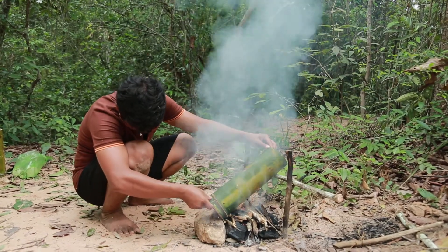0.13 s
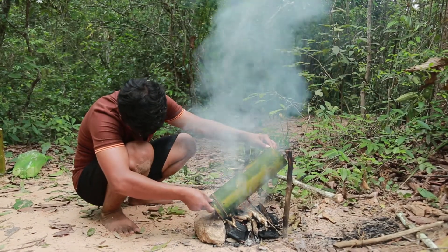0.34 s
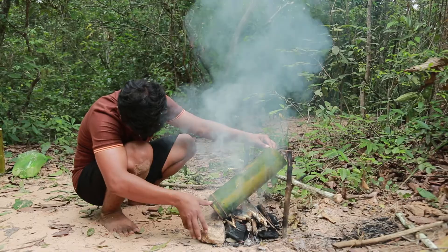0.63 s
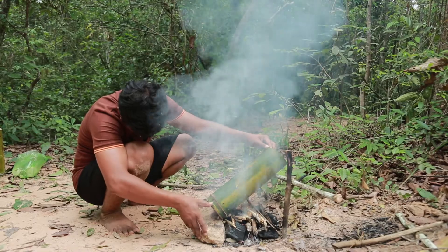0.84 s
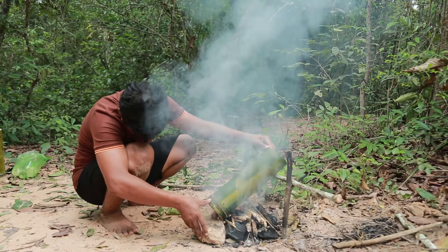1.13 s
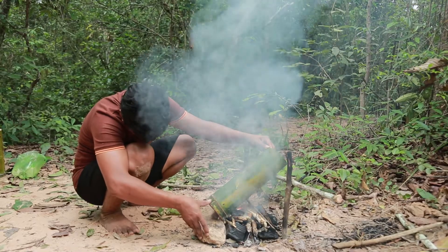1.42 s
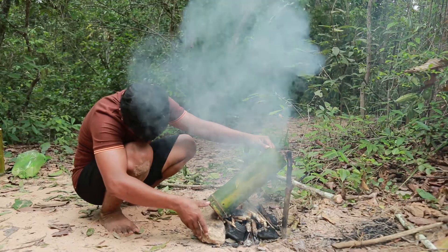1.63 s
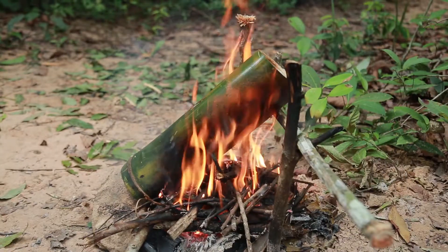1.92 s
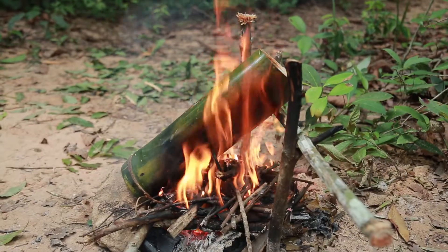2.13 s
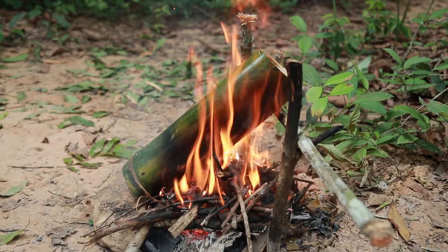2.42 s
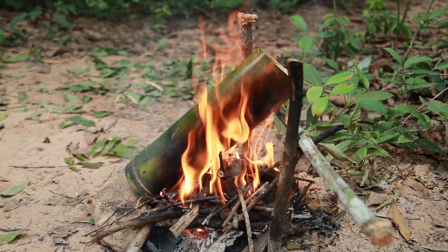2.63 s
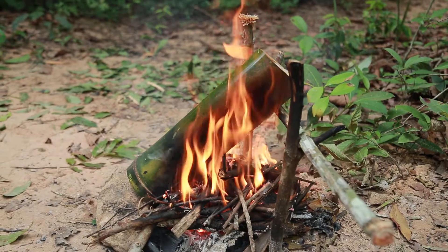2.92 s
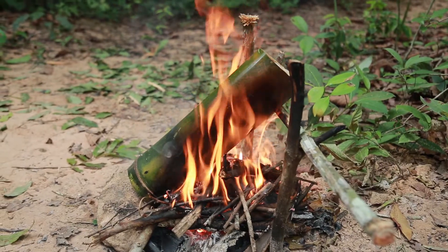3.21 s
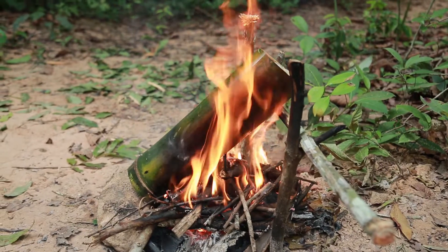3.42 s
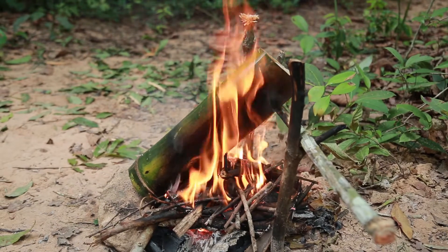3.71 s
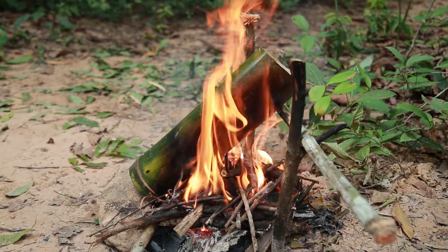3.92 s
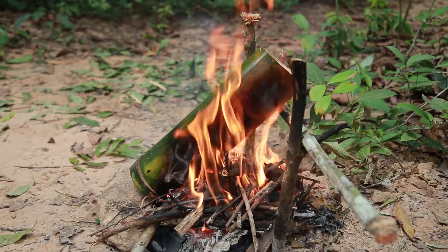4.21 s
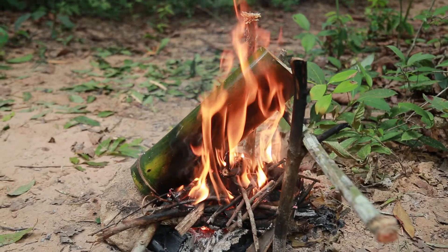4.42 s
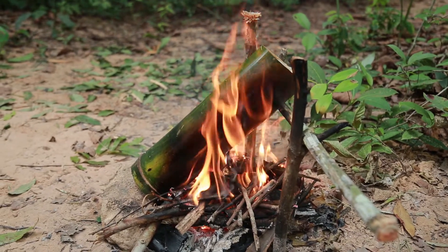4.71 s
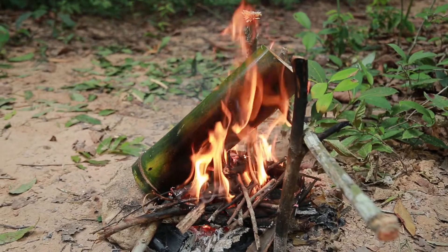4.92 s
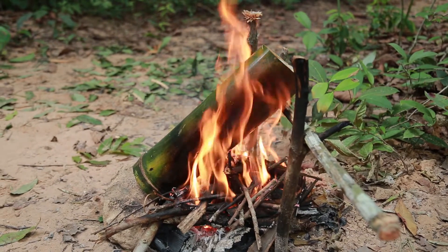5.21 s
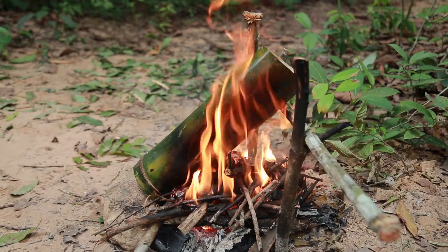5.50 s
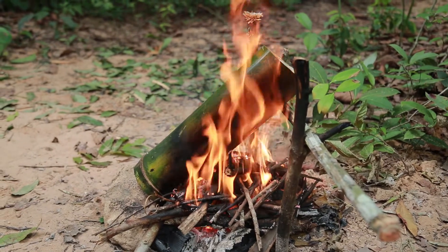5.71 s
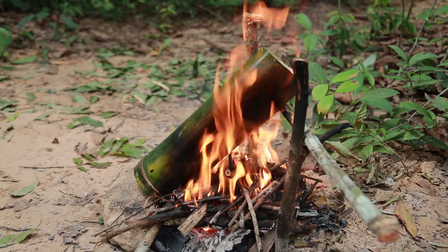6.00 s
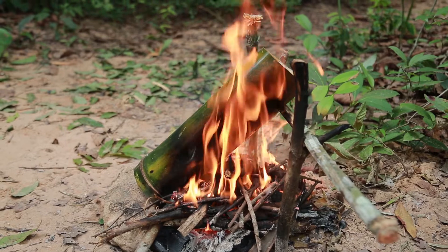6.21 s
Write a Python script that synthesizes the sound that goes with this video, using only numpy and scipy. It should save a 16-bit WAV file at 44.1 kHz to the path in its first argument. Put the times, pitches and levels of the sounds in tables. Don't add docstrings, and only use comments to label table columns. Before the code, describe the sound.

First, quiet outdoor ambience with crickets trilling at a high wavering pitch, faint breeze rumble and small dry clicks. Then a hard cut through a blink of silence to a close-miked fire: bright, spitting sap hiss, flapping low flames, little boiling blips and crisp gas pops with a quick ground slap. Several cracks jump out, and one near the end is far louder than the rest. No reverberant tail.

```python
import sys
import numpy as np
from scipy import signal
from scipy.fft import rfft, irfft
from scipy.io import wavfile
from scipy.ndimage import uniform_filter1d

SR = 44100
rng = np.random.default_rng(int(sys.argv[2]) if len(sys.argv) > 2 else 0)


def digitize_waveform(pressure):
    field = np.atleast_2d(pressure).T
    bounded = np.clip(field, -1, 1)
    quanta = np.round(bounded * 32767).astype(np.int16)
    wavfile.write(sys.argv[1], SR, quanta)


def gain_from_db(level_db):
    decades = np.asarray(level_db, float) / 20
    return 10 ** decades


N = 280476
JOIN_S = 1.73
EDGE_HZ, TOP_HZ = 15770, 16650


def evened(x):
    return x / np.sqrt(np.mean(x ** 2) + 1e-20)


def read(points, hz):
    f, value = np.transpose(points)
    return np.interp(np.log(hz + 1), np.log(f + 1), value)


def curves(rows, t):
    s, *columns = np.transpose(rows)
    return [np.interp(t, s, c) for c in columns]


def swells(base_db, rows, t):
    s, db, length = np.transpose(rows)[:, :, None]
    steps = np.arange(0, t[-1] + .01, .002)
    u = (steps - s) / length
    rise = np.exp(-(u / 0.83) ** 2)
    fall = np.exp(-abs(u) ** 1.3)
    power = gain_from_db(2 * base_db) + (gain_from_db(2 * db) * np.where(u < 0, rise, fall)).sum(0)
    return np.interp(t, steps, 10 * np.log10(power))


def add(mix, s, sound):
    part = mix[round(s * SR):][:len(sound)]
    part += sound[:len(part)]


def low_pass(x, hz):
    return signal.oaconvolve(x, signal.firwin(801, hz, window=("kaiser", 8), fs=SR), "same")


def resonate(x, hz, width):
    turn = np.exp(2j * np.pi * np.cumsum(hz * np.ones(len(x))) / SR)
    r = np.exp(-np.pi * width / SR)
    smooth = signal.lfilter([(1 - r) ** 2], [1, -2 * r, r * r], x / turn)
    return 2 * (turn * smooth).real


def whistles(rows, centre=0):
    out = 0
    for hz, width, db in rows:
        out = out + gain_from_db(db) * evened(resonate(rng.standard_normal(N), centre + hz, width))
    return out


def noise(spectrum, patchy_db, flicker_db, size=512, tilts=None):
    frames, hz = N // (size // 4) + 5, np.fft.rfftfreq(size, 1 / SR)
    a, b, patches = rng.standard_normal((frames, len(hz), 3)).T
    patches = uniform_filter1d(patches, size=4, axis=0)
    patches = evened(uniform_filter1d(patches, size=16, axis=1))
    flicker = evened(uniform_filter1d(rng.standard_normal(frames), size=5))
    level_db = read(spectrum, hz)[:, None] + patchy_db * patches + flicker_db * flicker
    if tilts is not None:
        low_db, top_db = tilts[:, np.minimum(np.arange(frames) * size // 4, N - 1)]
        level_db += np.clip((5500 - hz[:, None]) / 1500, 0, 1) * low_db
        level_db += np.clip((hz[:, None] - 9800) / 1500, 0, 1) * top_db
    _, x = signal.istft((a + 1j * b) * gain_from_db(level_db), nperseg=size, noverlap=size * 3 // 4)
    return evened(x[:N])


# pitch_hz, level_db
WHINE = [(15695, -64), (15736, -64)]


def whine(t):
    return sum(gain_from_db(db) * np.sin(2 * np.pi * hz * t) for hz, db in WHINE)


# pitch_hz, level_db (per Hz)
FOREST = [(15, -30), (30, 0), (60, -8.5), (110, -12.5), (165, -6.5), (260, -15), (460, -17), (950, -20),
          (1760, -25), (4580, -26.5), (6500, -31), (11000, -100)]
# peak_s, level_db, length_s
GUSTS = [
    (.3, -56, .05),
    (.65, -61, .04),
    (1.24, -60, 0.047),
    (1.68, -44, 0.026),
]


def air(t):
    still = gain_from_db(-54) * noise(FOREST, patchy_db=1.5, flicker_db=0.45, size=2048)
    rumble = noise([(20, 4), (50, 9), (120, -13), (300, -36), (900, -90)], 1.5, 1.0, size=2048)
    return still + gain_from_db(swells(-64, GUSTS, t) + 1.5) * rumble


# order, level_db
ENGINE = [(2, -63), (3, -57), (4, -70), (5, -68), (6, -55), (7, -64)]


def motor(t):
    engine_hz = 25.2
    wander = rng.standard_normal((len(ENGINE), N))
    wander = evened(uniform_filter1d(wander, size=6000, axis=1))
    out = np.zeros(N)
    for (order, db), w in zip(ENGINE, wander):
        out += gain_from_db(db + 0.75 * w) * np.sin(2 * np.pi * order * engine_hz * t + 0.41 * w)
    return out


# pitch_hz, level_db (per Hz)
FOREST_TOP = [(3410, -32), (5800, -18), (5870, -11.5), (8140, -9.5), (9220, -5.5), (10700, -7), (13000, 2),
              (15000, -7), (15600, -12)]
# pitch_hz, width_hz, level_db
KATYDIDS = [(9220, 90, -80), (9490, 80, -75), (10900, 40, -79), (11780, 40, -71), (12230, 35, -69),
            (12550, 45, -69), (12880, 40, -69), (13400, 40, -70), (13820, 40, -69), (14230, 50, -69),
            (14900, 50, -71), (1767, 60, -73.5), (3405, 61, -75)]


def insect_buzz(t):
    throb = 1 + 0.094 * np.cos(2 * np.pi * 170.0 * t)
    return throb * (gain_from_db(-52) * noise(FOREST_TOP, patchy_db=0.5, flicker_db=0.65) + whistles(KATYDIDS))


# offset_hz (from the chorus pitch), strokes_per_s, level_db
SINGERS = [(-15.5, 62, -3.5), (39.5, 52, -5.5), (-60.5, 58, -3), (100, 82, -2), (-120, 74, -7)]


def singers(centre):
    out = 0
    for (hz, rate, db), slip in zip(SINGERS, rng.standard_normal((len(SINGERS), 2, N))):
        pitch_slip, rate_slip = evened(uniform_filter1d(slip, size=900, axis=1))
        stroke_phase = 2 * np.pi * np.cumsum(rate * (1 + 0.07 * rate_slip)) / SR
        strokes = abs(1 + 0.74 * np.cos(stroke_phase)) ** 1.5
        tone = np.sin(2 * np.pi * np.cumsum(centre + hz + 11 * pitch_slip) / SR)
        out = out + gain_from_db(db) * strokes * tone
    return evened(out)


# start_s, pitch_hz, level_db
CHORUS = [(0, 5310, -49), (.2, 5330, -50), (.4, 5350, -47.5), (.6, 5400, -51), (.8, 5294, -48.5),
          (1.05, 5320, -47.5), (1.18, 5320, -49), (1.33, 5390, -48.5), (1.55, 5310, -48.5),
          (1.72, 5280, -51)]
# offset_hz (from the chorus pitch), width_hz, level_db
CRICKETS = [(-150, 110, -3), (-70, 96, 1), (-6, 41, 0), (78, 56, -4.5), (153, 160, -6.5)]


def crickets(t):
    centre, level_db = curves(CHORUS, t)
    crowd = evened(whistles(CRICKETS, centre))
    near = singers(5330 + 0.806 * (centre - 5330))
    return gain_from_db(level_db) * evened(0.33 * crowd + near)


# start_s, level_db (peak), pitch_hz, decay_s (to -60 dB), crack_db
TICKS = [(0.541, -39.5, 1410, 0.025, -5), (.5410, -46, 1790, .025, -11), (0.5396, -45, 4750, .018, -22),
         (.5402, -47, 5900, .018, -20), (0.9065, -43, 6400, .015, -15), (1.030, -47, 6600, .01, -2.5),
         (1.209, -45, 7090, .012, -2), (1.530, -48, 9900, 0.011, -4), (1.590, -48, 6200, .012, -11),
         (1.684, -45, 4560, 0.018, -12)]


def ticks():
    out, t = np.zeros(N), np.arange(2000) / SR
    for (s, db, hz, t60, crack_db), grit in zip(TICKS, rng.standard_normal((len(TICKS), 2000))):
        ring = np.sin(2 * np.pi * hz * t) * gain_from_db(-60 * t / t60) * (1 - np.exp(-t / 0.0018))
        crack = uniform_filter1d(grit, size=3) * gain_from_db(crack_db - 60 * t / 0.028)
        add(out, s, gain_from_db(db + 6.5) * (ring + crack))
    return out


def forest(t):
    return air(t) + motor(t) + insect_buzz(t) + crickets(t) + ticks()


# pitch_hz, level_db (per Hz)
FLAME = [(12, -37), (20, 5), (106, 3), (274, -7.5), (382, -14), (484, -13.5), (578, -21), (663, -18),
         (856, -27.5), (1430, -24.5), (1610, -34), (2200, -53), (2860, -55), (4840, -120)]
# peak_s, level_db, length_s
PUFFS = [(1.825, -46.5, 0.059), (1.88, -50, 0.019), (1.944, -43, 0.035), (2.074, -42, 0.03),
         (2.227, -42, 0.053), (2.411, -44, 0.068), (2.548, -46, 0.022), (2.66, -49, 0.025),
         (2.737, -44.5, 0.051), (2.943, -46.5, 0.073), (3.048, -47, 0.029), (3.145, -45, 0.021),
         (3.224, -45, 0.022), (3.341, -48, 0.032), (3.49, -45, 0.068), (3.775, -45.5, 0.067),
         (4.0, -46.5, 0.052), (4.194, -46.5, 0.07), (4.393, -45.5, 0.034), (4.65, -49.5, 0.25),
         (4.889, -46, 0.034), (5.033, -47.5, 0.042), (5.294, -42.5, 0.078), (5.41, -46, 0.025),
         (5.522, -46, 0.022), (5.62, -43.5, 0.029), (5.723, -43, 0.022), (5.9, -49, 0.16),
         (5.99, -46, 0.026), (6.171, -47, 0.206)]


def flames(t, steam_db):
    flame_db = swells(-50.5, PUFFS, t)
    flutter = noise(FLAME, patchy_db=0.5, flicker_db=2.0, size=1024)
    gusts = noise([(80, -42), (160, 0), (300, -5.5), (500, -17.5), (1000, -50)], 1.3, 1.8, size=1024)
    roar = noise([(200, -16), (400, -0.5), (1400, 1.5), (1700, -11.5), (2400, -14), (4000, -40)],
                 0.75, 0.96)
    out = gain_from_db(flame_db) * flutter
    out += gain_from_db(-61.0 + 0.72 * (flame_db + 47)) * gusts
    return out + gain_from_db(-54.5 + 0.053 * (steam_db + 45.5)) * roar


# pitch_hz, level_db (per Hz)
STEAM = [(900, -45), (1500, -10), (2100, -8.5), (2700, -3), (4200, -2.5), (4900, -6.5), (5900, 0),
         (7300, -0.5), (7800, -0.5), (9000, -2.5), (10150, 0), (10900, -6.5), (12200, -5.5), (14300, -2),
         (15800, -3.5)]
# peak_s, level_db, length_s, fizz_db (how bright the jet is)
SURGES = [(1.85, -53, 0.045, -12), (1.953, -50, 0.062, -1), (2.109, -48, 0.054, 0), (2.2, -44, 0.029, -1),
          (2.773, -46, 0.029, -5), (3.01, -49, 0.089, 3), (3.111, -44.0, 0.061, -2),
          (3.432, -43.5, 0.021, -9), (3.729, -42, 0.049, -4), (3.943, -43.0, 0.041, -12),
          (4.137, -41, 0.043, -3), (4.43, -42, 0.036, 0), (4.682, -43.5, 0.087, 1),
          (4.755, -41.5, 0.038, -3), (4.963, -42, 0.034, -4), (5.105, -44.0, 0.049, 2),
          (5.278, -45, 0.032, 1), (5.538, -42.5, 0.043, 1), (5.68, -43.5, 0.039, 0), (6.09, -43, 0.035, 0),
          (6.151, -39.5, 0.024, -3), (6.36, -46, 0.05, 3)]


def steam(t):
    s, db, length, fizz_db = np.transpose(SURGES)
    steam_db = swells(-43, np.c_[s, db, length], t)
    top_db = swells(-43, np.c_[s, db + fizz_db, length], t)
    heat = np.maximum(t, JOIN_S)
    low_tilt = (0.21 - 1) * steam_db - 0.04 * heat
    top_tilt = top_db - steam_db + 0.52 * heat
    tilts = np.array([low_tilt, top_tilt])
    hiss = noise(STEAM, patchy_db=0.7, flicker_db=0.52, tilts=tilts - tilts.mean(1, keepdims=True))
    grains = gain_from_db(3.9 * np.minimum(rng.exponential(1, N), 5))
    grains *= rng.random(N) < 500 / SR
    spits = resonate(grains * rng.choice([-1, 1], N), 6000, 11400)
    return gain_from_db(steam_db + 4.0) * (hiss + 0.13 * evened(spits)), steam_db


def fire(t):
    jets, steam_db = steam(t)
    return flames(t, steam_db) + jets


# start_s, pitch_hz, level_db,
# length_s
BUBBLES = [(2.165, 1500, -54, .03), (2.24, 1410, -48, .03), (2.385, 1100, -48, 0.012),
           (2.486, 1035, -46.5, 0.023), (2.509, 1360, -48, 0.027), (2.55, 2800, -47, .015),
           (2.558, 1430, -49, .05), (2.651, 1500, -49.5, .025), (2.738, 1340, -49, .025),
           (2.767, 5400, -42, .008), (2.905, 5200, -48, .015), (2.965, 2500, -47, .012),
           (5.3802, 1780, -34.5, 0.0047), (5.5030, 1890, -28.5, 0.002), (3.6224, 2540, -38, 0.0032)]


def bubbles():
    out, t = np.zeros(N), np.arange(4000) / SR
    for (s, hz, db, length), grit in zip(BUBBLES, rng.standard_normal((len(BUBBLES), 4000))):
        blip = np.sin(2 * np.pi * hz * t * (1 + .6 * t)) + .5 * evened(resonate(grit, hz, 300))
        rise = 1 - np.exp(-t * 15 / length)
        add(out, s, gain_from_db(db + 6 - 25 * t / length) * blip * rise)
    return out


def shock(t, ms):
    push = np.exp(-((t + ms / 1400) / (ms / 2200)) ** 2)
    snap = np.exp(-(t / .000022) ** 2)
    return snap - push * snap.sum() / push.sum()


# start_s, level_db (peak), push_ms, bounce_delay_ms, bounce_share (of the direct shock)
POPS = [(2.0882, -18, 0.1, 0.23, 1), (2.4872, -24, 0.18, 0.42, 0.7), (2.553, -29, 0.18, .37, .8),
        (2.6306, -21, 0.068, 0.33, 0.7), (2.788, -20, 0.091, 0.61, .7), (3.3471, -7, 0.11, 0.42, 0.4),
        (3.6228, -13, 0.069, 0.42, 0.2), (4.1311, -19, 0.078, 0.16, 0.7), (4.4724, -5.5, 0.098, 0.42, 0.52),
        (5.021, -26, 0.061, 0.16, .6), (5.33559, 6.5, 0.13, 0.308, 0.32), (5.33586, 4.5, 0.042, 0.13, 0.9),
        (5.3806, -22, 0.15, 0.22, -2.6), (5.5035, -24, 0.43, .47, 1.4), (6.1484, -24, 0.086, 0.54, 0.6),
        (6.352, -22, 0.25, 0.5, 0.7), (2.768, -24, .15, .3, .3)]
SHARP_POPS = (5, 6, 10, 11, 15)
# pitch_hz, width_hz, level_db
RINGS = [(1150, 370, -21), (2880, 4500, -25), (8100, 2200, -14), (10210, 640, -9), (14000, 1400, -10)]


def pops():
    soft, sharp, t = np.zeros(N), np.zeros(N), np.arange(-44, 3000) / SR
    for k, (s, db, ms, delay_ms, share) in enumerate(POPS):
        burst = shock(t, ms) + share * shock(t - delay_ms / 1000, ms)
        rings = sum(gain_from_db(g) * resonate(burst, hz, width) for hz, width, g in RINGS)
        rattle_db = -21.5 - .5 * db + 12 * ms
        grit = rng.standard_normal(len(t))
        rattle = evened(signal.lfilter([1, 0, -1], [1, -.7, .3], grit)) * (t > .0001)
        rattle *= gain_from_db(rattle_db) * (gain_from_db(-60 * t / 0.0072) + 0.14 * gain_from_db(-60 * t / 0.042))
        pop = gain_from_db(db) * (burst + 3 * rings + rattle)
        add(sharp if k in SHARP_POPS else soft, s + t[0], pop)
    return soft, sharp


def duck(t):
    drop_db, hold_s, release_s = -1.5, 0.13, 0.026
    since = t - max(POPS, key=lambda row: row[1])[0]
    return gain_from_db(drop_db * (since > 0) * np.clip(1 - (since - hold_s) / release_s, 0, 1))


# start_s, level_db
CUT = [
    (0, 1),
    (1.7135, 1.5),
    (1.7145, -13),
    (1.745, -54),
    (1.759, -71),
    (1.7618, -10),
    (1.7638, 1.5),
    (6.4, 0.5),
]


def cut_db(t):
    return curves(CUT, t)[0]


def scene():
    t = np.arange(N) / SR
    soft, sharp = pops()
    by_fire = duck(t) * fire(t) + bubbles() + soft
    steady = np.where(t < JOIN_S, forest(t), by_fire) + whine(t)
    mid = gain_from_db(cut_db(t)) * low_pass(steady, EDGE_HZ) + sharp
    return np.array([mid, mid])


# pitch_hz, level_db (per Hz)
CAPSULE = [(24, -33), (40, -2), (398, 3.5), (4050, -12.5), (5070, -0.5), (5470, -27), (6350, -6.5),
           (15600, -8.5)]


def capsule_noise(t):
    level_db = -64.5 + cut_db(t) + np.where(t < JOIN_S, 0, -9)
    return gain_from_db(level_db) * low_pass(noise(CAPSULE, 4.5, .3, size=1024), EDGE_HZ)


# middle_s, level_db
PARTINGS = [(2.9, -52), (3.76, -61), (4.04, -60), (4.665, -39), (5.715, -41), (5.76, -48)]


def partings():
    out, hz = np.zeros(N), np.fft.rfftfreq(2048, 1 / SR)
    for (s, db), grit in zip(PARTINGS, rng.standard_normal((len(PARTINGS), 2048))):
        picked = grit[(hz // 1400).astype(int)] > 0
        bands = picked & (hz > 4200) & (hz < EDGE_HZ)
        burst = evened(irfft(rfft(grit) * bands)) * np.hanning(2048)
        add(out, s - 1024 / SR, gain_from_db(db - 1.5) * burst)
    return out


def top_cut(x):
    return signal.sosfilt(signal.butter(12, 17000, fs=SR, output="sos"), x)


def record(dry):
    mid = signal.lfilter(*signal.butter(2, 33, "high", fs=SR), dry[0])
    mid = low_pass(np.clip(mid, -.93, .93), TOP_HZ)
    side = capsule_noise(np.arange(N) / SR) + partings()
    return top_cut(np.array([mid + side, mid - side]))


dry = scene()
out = record(dry)
digitize_waveform(out)
```